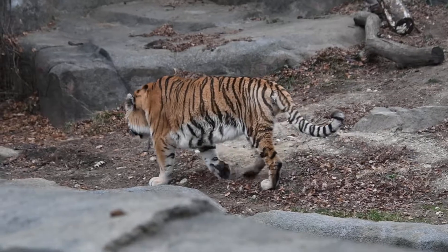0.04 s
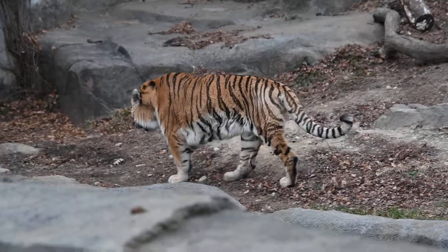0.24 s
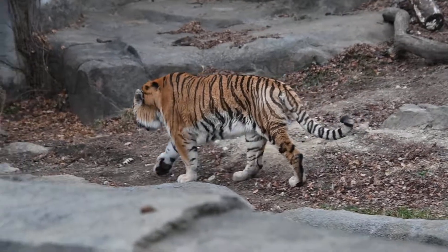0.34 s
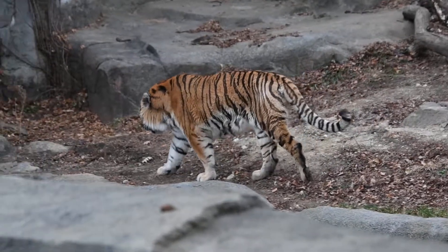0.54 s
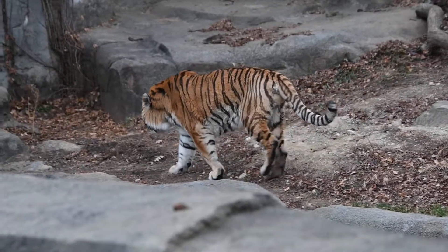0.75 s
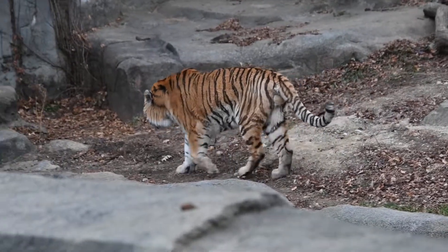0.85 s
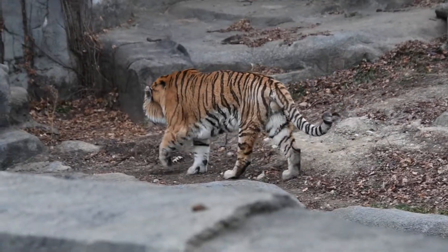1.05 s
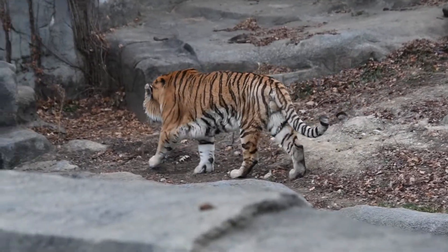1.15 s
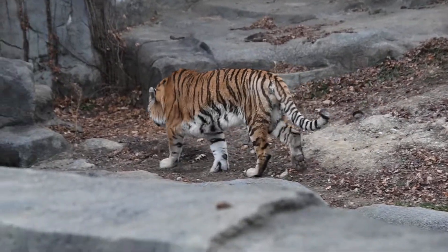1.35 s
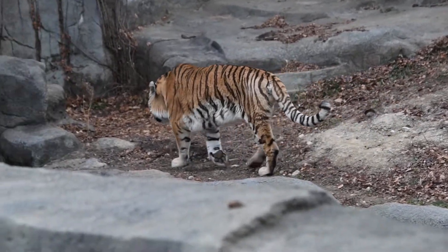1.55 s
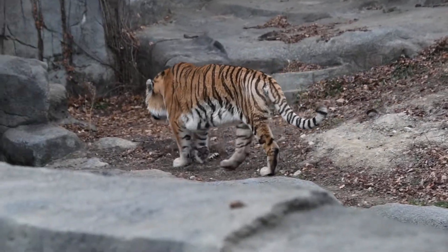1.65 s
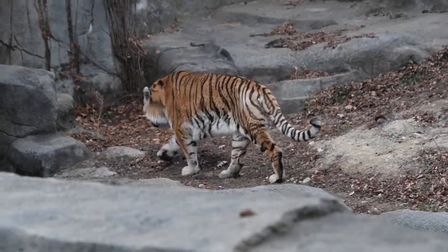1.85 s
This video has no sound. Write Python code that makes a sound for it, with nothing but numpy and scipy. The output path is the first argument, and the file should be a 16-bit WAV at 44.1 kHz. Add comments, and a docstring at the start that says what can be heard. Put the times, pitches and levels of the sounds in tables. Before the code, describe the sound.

One tiger moan swells from a hoot into a raspy roar, then sinks away.

```python
"""A tiger gives one long moan in a rocky outdoor enclosure. The call starts as a clear hoot, rises, breaks into
a rough roar and sinks to a throbbing groan as the throat resonances fall. Unsteady vocal folds make the tone
and chop the breath into rasp and hiss; a second oscillation sounds beside them. Rock walls throw the call back
over a low rumble; a small sharp tap comes near the end."""
import sys
import numpy as np
from scipy import signal
from scipy.fft import rfft, irfft
from scipy.io import wavfile

SR = 44100
rng = np.random.default_rng(int(sys.argv[2]) if len(sys.argv) > 2 else 0)


def file_out(sig):
    """Save sig as 16-bit WAV at sys.argv[1]."""
    # one column per channel
    cols = np.atleast_2d(sig).T
    # limit, then scale
    lim = np.clip(cols, -1, 1)
    pcm = np.round(lim * 32767).astype(np.int16)
    wavfile.write(sys.argv[1], SR, pcm)


N = 83790
T = np.arange(N) / SR
BINS = np.fft.rfftfreq(2 * N, 1 / SR)

# Throat resonances as the mouth moves. Each row: time in seconds, then six centres in Hz, lowest first.
FORMANT_PATHS = [(.3, 290, 643, 965, 1230, 1584, 1850), (.39, 293, 647, 988, 1176, 1677, 1930),
                 (.44, 270.6, 661, 834, 1220, 1597, 1950), (.6, 309, 592.6, 883, 1277, 1817, 2160),
                 (.69, 326, 606, 922, 1430, 1717, 2274), (.8, 263.5, 622, 875, 1340, 1520, 2250),
                 (.93, 240, 595, 805, 1154, 1440, 2026), (1.15, 207, 544, 800, 1103, 1450, 2030),
                 (1.45, 172.8, 516, 814, 1128, 1366, 2006)]
# The same six. Each row: width in Hz and gain in dB for the clear voice, then both for the rough voice.
FORMANT_SHAPES = [(104, 0, 80, 0.5), (149.3, 0, 195, -4.5), (116, -6.5, 189, -9.5),
                  (152.5, -34.5, 79, -19.5), (100, -28.5, 58, -12.5), (347, -42, 283, -25)]


def amp(db):
    """Decibels to gain."""
    return 10 ** (np.asarray(db) / 20)


def unit(x):
    """Scales to rms 1."""
    return x / np.sqrt(np.mean(x ** 2) + 1e-20)


def curve(table, t=T):
    """Every value column of a timed table at the times t."""
    s, *columns = np.transpose(table)
    return [np.interp(t, s, c) for c in columns]


def envelope(table):
    """Gain from rows that begin with seconds and dB, fading to silence outside their span."""
    outside_s = np.maximum(table[0][0] - T, 0) + np.maximum(T - table[-1][0], 0)
    return amp(curve(table)[0]) * np.exp(-outside_s / 0.051)


def spectrum(points, hz=BINS):
    """A table's values, joined along a log-frequency axis."""
    f, value = np.transpose(points)
    return np.interp(np.log(hz + 1), np.log(f), value)


def shape(x, gain):
    """Filters x by a gain given on BINS."""
    return irfft(rfft(x, 2 * N) * gain)[..., :N]


def peak(hz, centre_hz, width_hz):
    """Gain of a steep-sided resonance."""
    return 1 / (1 + 2 * ((hz - centre_hz) / width_hz) ** 2) ** 2


def wander(hz):
    """Smooth random motion of rms 1, rolling off around hz."""
    return unit(shape(rng.standard_normal(N), np.exp(-(BINS / hz) ** 2)))


def diffuse_noise():
    """Stereo noise from all round: centred in the bass, wide in the treble."""
    # Each row: frequency in Hz, likeness of the two channels from 0 to 1.
    channel_likeness = [(60, 1), (280, 0.88), (600, 0.42), (1200, 0.55), (2400, 0.22), (4500, 0.15),
                        (12000, 0)]
    alike = spectrum(channel_likeness)
    mid = shape(rng.standard_normal(N), np.sqrt((1 + alike) / 2))
    side = shape(rng.standard_normal(N), np.sqrt((1 - alike) / 2))
    return np.array([mid + side, mid - side])


def rumble():
    """A steady bed of low, diffuse noise."""
    # Each row: frequency in Hz, relative level in dB.
    colour = [(20, -6), (35, -14.5), (58, 1), (90, 0.5), (125, 2), (200, -2), (300, -12.5), (450, -21),
              (900, -20), (1800, -25.5), (2700, -41.5), (4500, -34), (6400, -35.5), (9500, -38),
              (15500, -48.5)]
    return amp(-41.5) * unit(shape(diffuse_noise(), amp(spectrum(colour))))


def enclosure_tail(call):
    """The rock walls scatter the call into a diffuse tail, longest near 300 Hz."""
    # Each row: frequency in Hz, seconds to fall by 60 dB.
    decay_times = [(150, 0.83), (300, 2.7), (600, 1), (2000, 0.83), (8000, 0.2)]
    hz, t, noise = signal.stft(diffuse_noise(), SR, nperseg=512)
    fade = amp(-60 * t / spectrum(decay_times, hz)[:, None])
    fade /= np.sqrt((fade ** 2).mean(1, keepdims=True) * N)  # equal energy in every band
    tail = signal.istft(noise * fade, SR, nperseg=512)[1][:, :N]
    attack = np.minimum(T / 0.0067, 1)
    return signal.fftconvolve(call.mean(0)[None], tail * attack, axes=1)[:, :N]


def rock_echoes(call, cutoff_hz=497):
    """Two rock faces each throw back a dull copy of the call."""
    # Each row: delay in seconds, gain in dB.
    reflections = [(0.048, -22.5), (.165, -11)]
    dull = shape(call, 1 / np.hypot(1, (BINS / cutoff_hz) ** 2))
    return sum(amp(db) * np.pad(dull, ((0, 0), (round(s * SR), 0)))[:, :N] for s, db in reflections)


def taps(crack_db=-19.5, crack_decay_s=0.0016):
    """A dry crack with a short ring, and a fainter one before and after it."""
    # Each row: start in seconds, gain in dB, left over right in dB.
    hits = [(1.7435, -24, -10), (1.7588, -4.5, 7), (1.8660, -28.5, 1)]
    # The tapped thing's ring. Each row: frequency in Hz, relative level in dB, seconds to fall by 60 dB.
    modes = [(1960, -32, 0.035), (3930, -39.5, 0.057), (4850, -50, 0.062), (6150, -37, .035),
             (6996, -46, 0.036)]
    # Each row: frequency in Hz, relative level in dB.
    crack_colour = [(500, -13), (1300, -5), (2000, 3), (2600, -13), (3300, -3), (4600, 7), (5400, -3),
                    (5900, 7), (7000, -15), (10000, -14.5), (15000, -36)]
    colour = unit(amp(spectrum(crack_colour)))
    out = np.zeros((2, N))
    for start, db, pan_db in hits:
        age = np.maximum(T - start, 0)
        burst = diffuse_noise() * np.exp(-age / crack_decay_s) * (T > start)
        crack = amp(crack_db) * shape(burst, colour)
        ring = sum(amp(mode_db - 60 * age / t60) * np.sin(2 * np.pi * hz * age)
                   for hz, mode_db, t60 in modes)
        out += (crack + ring) * amp(db + pan_db * np.array([[.5], [-.5]]))
    return out


def snarl(puffs):
    """Air through the nearly closed mouth makes a thin resonant hiss."""
    # Each row: time in seconds, level in dB.
    levels = [(1.28, -70), (1.41, -52), (1.47, -60), (1.54, -59), (1.64, -69)]
    # Resonances at the teeth. Each row: centre in Hz, width in Hz, relative gain in dB.
    teeth = [(3256, 370, 0), (4800, 480, -1)]
    colour = sum(amp(db) * peak(BINS, hz, width) for hz, width, db in teeth)
    return unit(shape(puffs, colour)) * envelope(levels)


def breath_hiss(puffs, flutter_db=1.4, flutter_hz=24.2):
    """Air rushes through the mouth and whistles at the teeth and lips."""
    # Each row: time in seconds, level in dB.
    levels = [(.15, -73.5), (.26, -53), (.36, -53.5), (.46, -49.5), (.54, -46), (.64, -46.5), (.77, -44),
              (.92, -47.5), (1.06, -47), (1.2, -49), (1.32, -53.5), (1.55, -60.5), (1.7, -72)]
    # Each row: frequency in Hz, relative level in dB.
    air_colour = [(1000, -44), (2200, -33), (2800, -0.5), (3250, -8), (3800, -1), (4500, -2.5), (5500, -2),
                  (6500, -7), (8000, -9.5), (9300, -8), (12000, -20.5), (15500, -49.5)]
    # Each row: centre in Hz, width in Hz, relative gain in dB.
    whistles = [(3206, 190, 1.5), (4420, 500, -10.5), (6410, 570, -3)]
    colour = amp(spectrum(air_colour)) + sum(amp(db) * peak(BINS, hz, w) for hz, w, db in whistles)
    return unit(shape(puffs, colour)) * envelope(levels) * amp(flutter_db * wander(flutter_hz))


def grunts(width_s=0.018):
    """Gain of the low tone's last pushes as the call dies away, each a short smooth swell."""
    # Each row: time of the crest in seconds, level in dB.
    pushes = [(1.275, -38), (1.314, -30), (1.391, -18), (1.426, -19), (1.526, -24), (1.63, -31.5),
              (1.682, -29.5), (1.75, -28)]
    return sum(amp(db) * np.exp(-((T - s) / width_s) ** 2) for s, db in pushes)


def groan(waver_hz=41.3):
    """A second oscillation sounds the opening hoot, holds it, then slides down as the roar closes."""
    # Each row: time in seconds, pitch in Hz, level in dB, waver as a share of the pitch.
    glide = [(.13, 288.3, -49.5, 0.024), (.185, 272.2, -40.5, 0.0058), (.215, 278.8, -26.5, 0.0059),
             (.25, 281, -62, 0.0056), (.285, 279, -36.5, 0.0037), (.31, 281.8, -21.5, 0.0015),
             (.375, 285.8, -13, 0.0016), (.42, 283.8, -17, 0.0023), (.455, 283.1, -25.5, 0.0024),
             (.51, 279.1, -18.5, 0.0024), (.56, 286, -22, .003), (.6, 283, -46.5, 0.0066),
             (.66, 288.3, -48.5, 0.0086), (.77, 284.1, -36.5, 0.0084), (.84, 248.5, -29.5, 0.023),
             (.9, 231.1, -20.5, .015), (.96, 228.2, -26.5, 0.017), (1.01, 220.6, -24.5, 0.034),
             (1.08, 221, -22, 0.023), (1.15, 202.4, -28, 0.0091), (1.28, 185.6, -44.5, .025)]
    hz, _, waver = curve(glide)
    cycles = np.cumsum(hz * (1 + waver * wander(waver_hz))) / SR
    return np.sqrt(2) * np.sin(2 * np.pi * cycles) * envelope([(s, db) for s, _, db, _ in glide])


def rough_voice(puffs):
    """Noisy puffs pass the moving throat resonances; the top three open with the mouth."""
    # Each row: time in seconds, level in dB, gain from the mouth's opening in dB.
    rasp = [(.1, -61, -20), (.2, -37, -6), (.3, -30.5, -5), (.45, -33, -3), (.6, -38, 2.5),
            (.7, -27.5, 0.5), (.8, -22.5, -0.5), (.95, -23.5, 1.5), (1.13, -26.5, 6), (1.27, -30.5, 6.5),
            (1.42, -32.5, 2), (1.58, -39.5, 4.5), (1.7, -43, -1.5), (1.82, -44, -3.5)]
    # Roughness between the resonances. Each row: frequency in Hz, relative level in dB.
    valleys = [(60, -61.5), (120, -50), (210, -7.5), (360, -7), (440, -14), (700, -47.5), (1020, -35),
               (1300, -22.5), (1700, -29), (2300, -35), (3200, -63)]
    hz, t, frames = signal.stft(puffs, SR, nperseg=2048, noverlap=1792)
    hz = hz[:, None]
    opening = amp(curve(rasp, t)[1])
    powers = [(amp(db) * peak(hz, centre, width)) ** 2
              for centre, (_, _, width, db) in zip(curve(FORMANT_PATHS, t), FORMANT_SHAPES)]
    mouth_power = sum(powers[3:]) + amp(spectrum(valleys, hz)) ** 2
    gain = np.sqrt(sum(powers[:3]) + opening ** 2 * mouth_power)
    voice = signal.istft(frames * gain, SR, nperseg=2048, noverlap=1792)[1][:, :N]
    return unit(voice) * envelope(rasp)


def clear_voice(pitch, cycles, chest_hz=191.7, chest_width_hz=150):
    """The folds' harmonics swell as they cross the resonances of throat and chest."""
    # Tone in the lowest throat resonance, the higher ones and the chest.
    # Each row: time in seconds, level in dB.
    hoot_levels = [(.39, -43.5), (.45, -25.5), (.51, -23.5), (.56, -29.5), (.605, -13.5), (.65, -29.5),
                   (.71, -20.5), (.77, -36), (.92, -44), (1.02, -24), (1.1, -15.5), (1.165, -15.5),
                   (1.22, -18), (1.26, -27.5), (1.45, -35.5), (1.66, -43)]
    ring_levels = [(.12, -67), (.28, -38.5), (.38, -32), (.43, -19.5), (.515, -17), (.565, -21.5),
                   (.62, -21.5), (.69, -21.5), (.78, -25.5), (.94, -25), (1.03, -32.5), (1.13, -24),
                   (1.22, -40.5), (1.42, -36), (1.62, -63)]
    chest_levels = [(.3, -42.5), (.54, -42.5), (.6, -31), (.72, -25), (.85, -26), (.91, -39.5),
                    (1.0, -22.5), (1.2, -50.5)]
    # Strong and weak cycles alternate, adding partials halfway between the harmonics.
    # Each row: time in seconds, their level against the harmonics in dB.
    period_doubling = [(.2, 2.5), (.37, -5), (.45, -40), (.62, -35.5), (.75, -3.5), (.86, -11.5),
                       (.97, -4.5), (1.4, -20.5)]
    orders = np.arange(2, 29)[:, None] / 2
    hz, halfway = orders * pitch, orders % 1 > 0
    lowest, *higher = [amp(db) * peak(hz, centre, width)
                       for centre, (width, db, _, _) in zip(curve(FORMANT_PATHS), FORMANT_SHAPES)]
    hoot = (envelope(hoot_levels) + grunts()) * lowest
    chest = envelope(chest_levels) * peak(hz, chest_hz, chest_width_hz)
    ring = envelope(ring_levels) * np.sqrt(sum(gain ** 2 for gain in higher))
    doubling = amp(curve(period_doubling)[0])
    gains = np.where(halfway, ring * doubling, np.sqrt(hoot ** 2 + chest ** 2 + ring ** 2))
    partials = np.cos(2 * np.pi * (orders * cycles + rng.random(orders.shape)))
    return np.sqrt(2) * (gains * partials).sum(0)


def tiger(jitter_hz=66.4, throb_hz=42.4, puff_decay_cycles=0.9):
    """One call: the same unsteady folds drive tone, rasp, hiss and snarl; the groan sounds beside them."""
    # Each row: time in seconds, pitch of the folds in Hz.
    melody = [(.15, 139), (.3, 140.5), (.385, 143.1), (.415, 157.6), (.5, 158.6), (.59, 164.4),
              (.66, 173.8), (.76, 180.5), (.95, 184.6), (1.12, 181.9), (1.22, 177.8), (1.33, 167.5),
              (1.43, 153.6), (1.55, 161.1)]
    # Each row: time in seconds, jitter as a share of the pitch, throb as a share of the amplitude.
    unsteadiness = [(.3, .004, 0.043), (.62, 0.0066, 0.15), (.8, 0.013, 0.21), (1.1, 0.017, 0.15),
                    (1.5, 0.017, 0.26)]
    # Each row: frequency in Hz, left over right in dB.
    balance = [(180, -0.7), (330, 2.4), (650, -3), (1300, -3.5), (4500, -3.6), (9000, -0.3)]
    pitch = curve(melody)[0]
    jitter, depth = curve(unsteadiness)
    cycles = np.cumsum(pitch * (1 + jitter * wander(jitter_hz))) / SR
    airflow = unit(0.41 + np.exp(-(cycles % 1) / puff_decay_cycles))  # steady flow plus a puff a cycle
    throb = (1 + depth * wander(throb_hz)) / np.sqrt(1 + depth ** 2)
    hiss = breath_hiss(diffuse_noise() * airflow)
    tone = clear_voice(pitch, cycles) * throb + groan()
    rasp = rough_voice(diffuse_noise() * airflow)
    call = tone + rasp + hiss + snarl(diffuse_noise() * airflow)
    return shape(call, amp(np.outer([.5, -.5], spectrum(balance))))


def scene():
    """The call with its echoes and tail, the dry taps and the rumble."""
    call = tiger()
    return call + rock_echoes(call) + taps() + rumble() + amp(-8) * enclosure_tail(call)


def record(dry, cutoff_hz=15800):
    """The recorder cuts two narrow dips in the treble and limits the band."""
    # Each row: centre in Hz, width in Hz, gain in dB.
    dips = [(2626, 66, -15), (7690, 344, -16.5)]
    dips_db = sum(db * np.exp(-((BINS - hz) / width) ** 2) for hz, width, db in dips)
    lowpass = signal.firwin(511, cutoff_hz, window=("kaiser", 9), fs=SR)
    return signal.oaconvolve(shape(dry, amp(dips_db)), lowpass[None], "same")


dry = scene()
out = record(dry)
file_out(out)
```